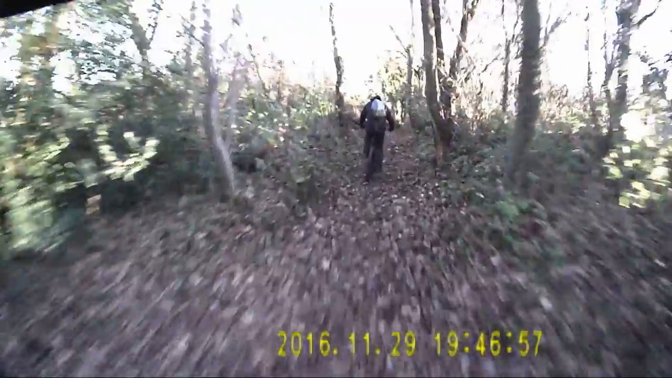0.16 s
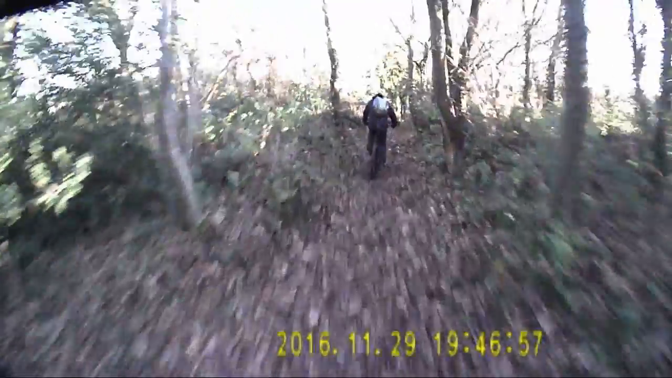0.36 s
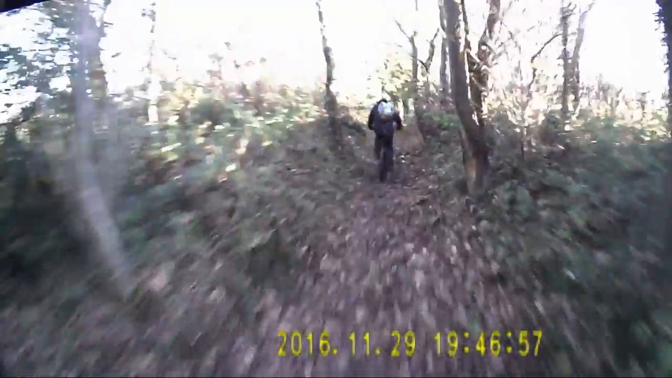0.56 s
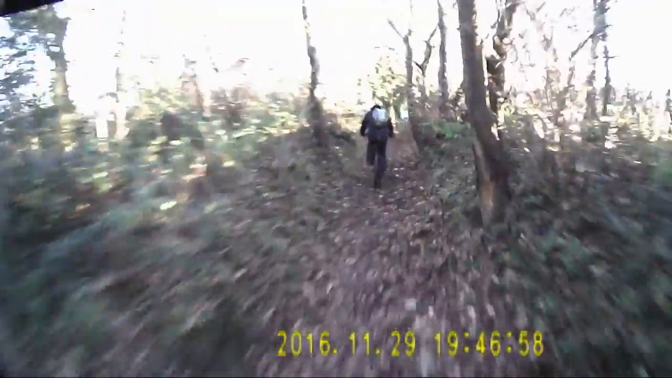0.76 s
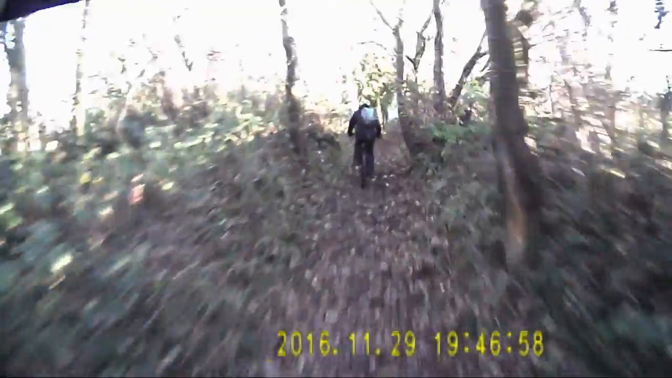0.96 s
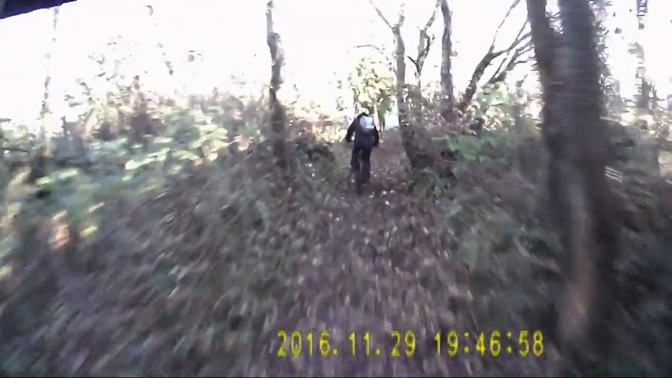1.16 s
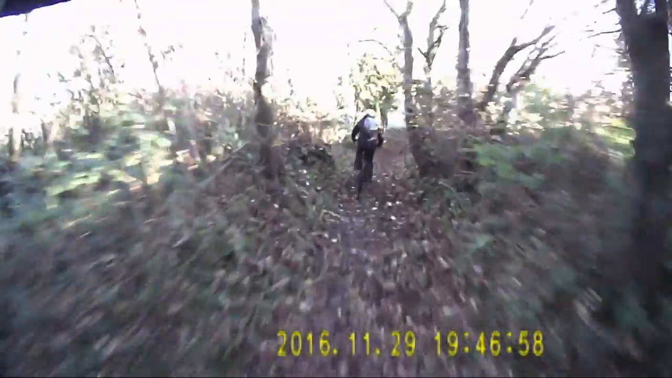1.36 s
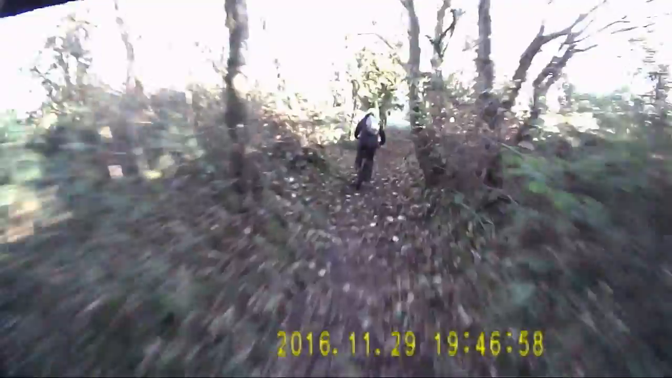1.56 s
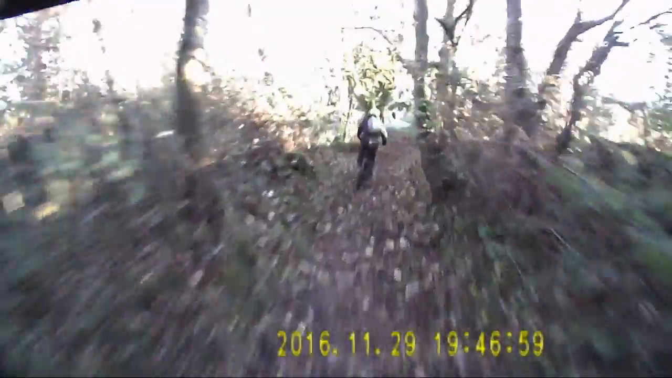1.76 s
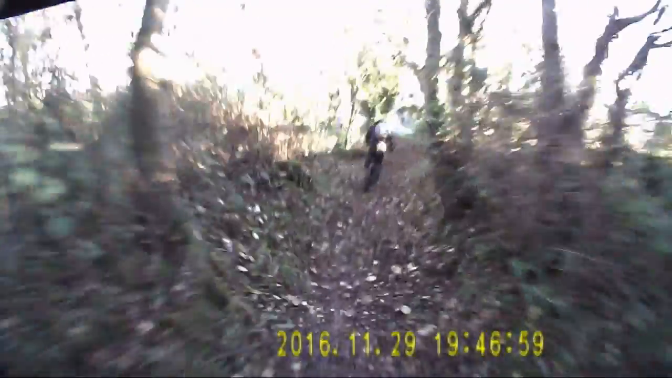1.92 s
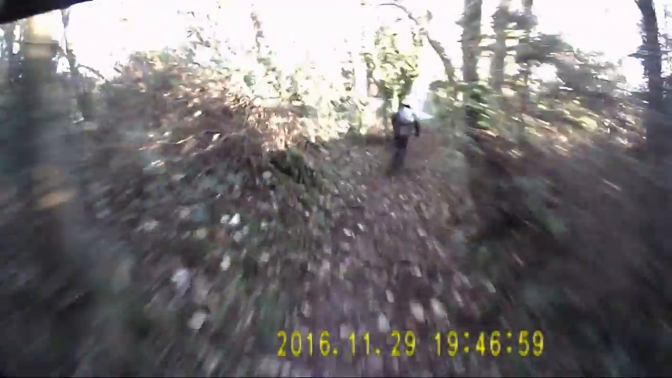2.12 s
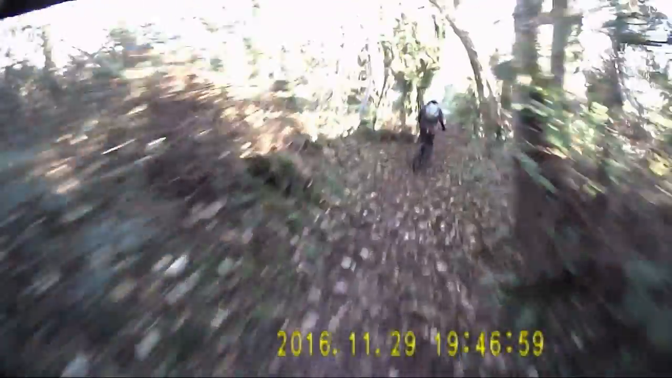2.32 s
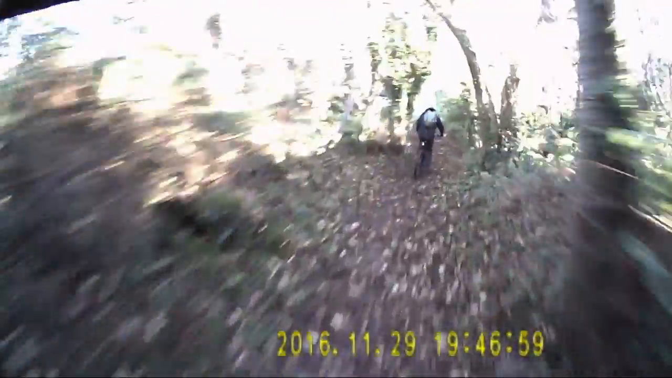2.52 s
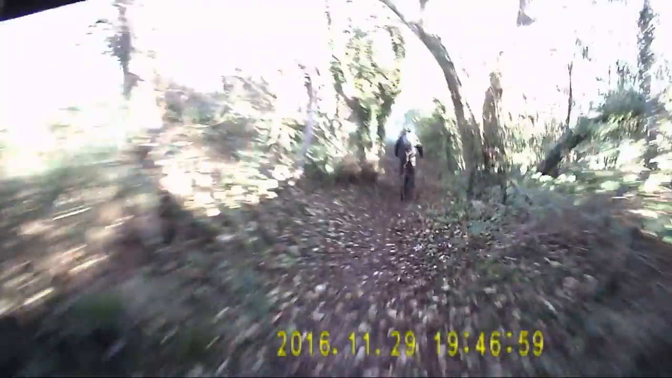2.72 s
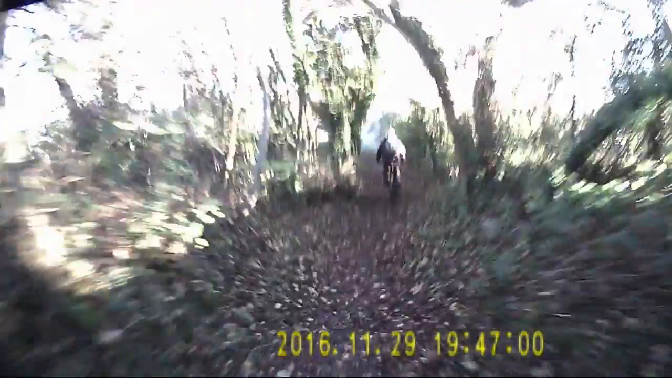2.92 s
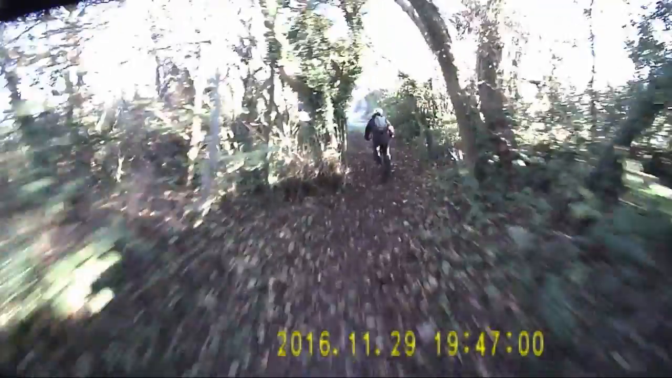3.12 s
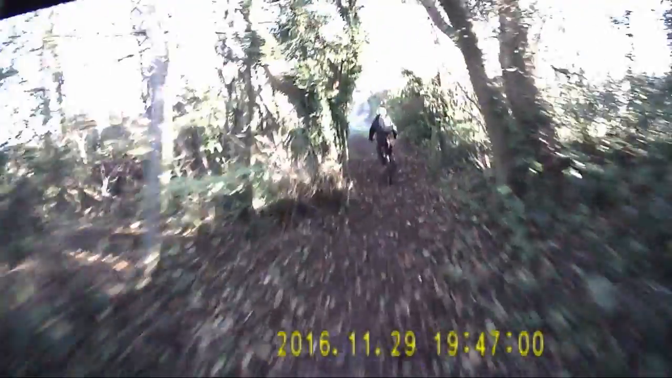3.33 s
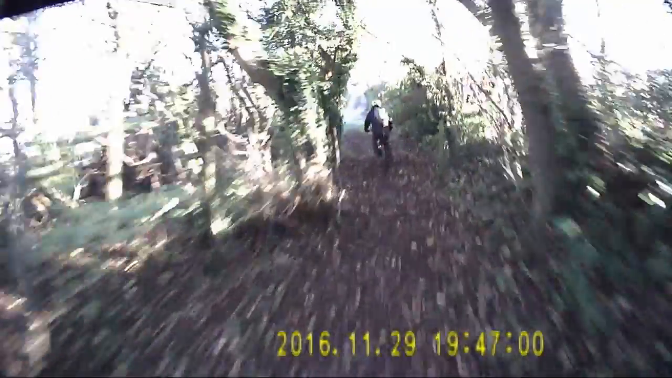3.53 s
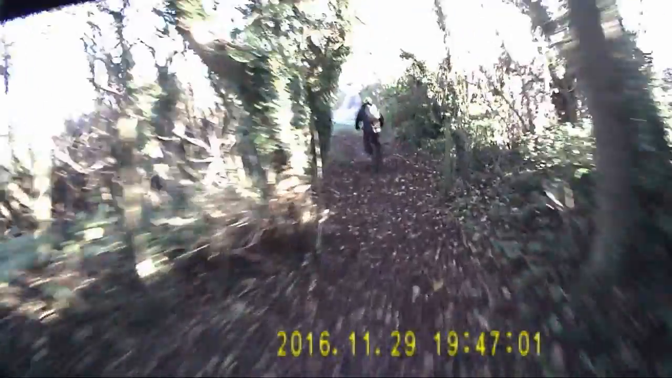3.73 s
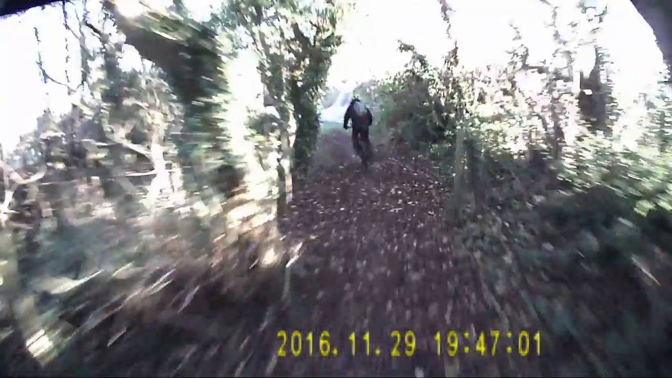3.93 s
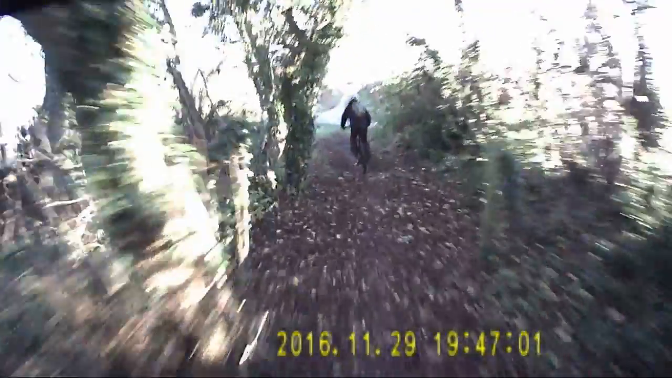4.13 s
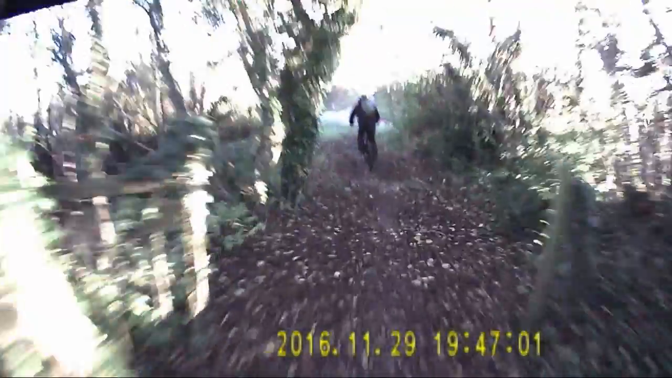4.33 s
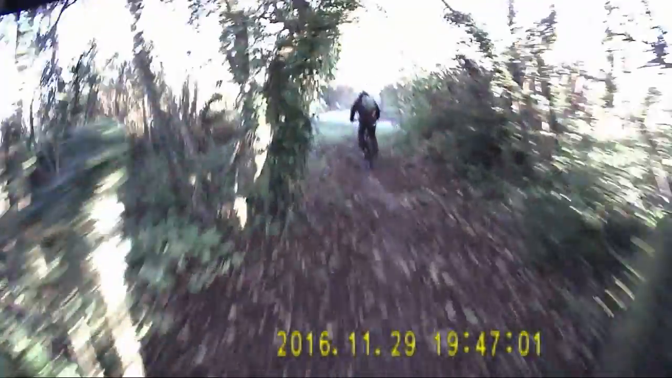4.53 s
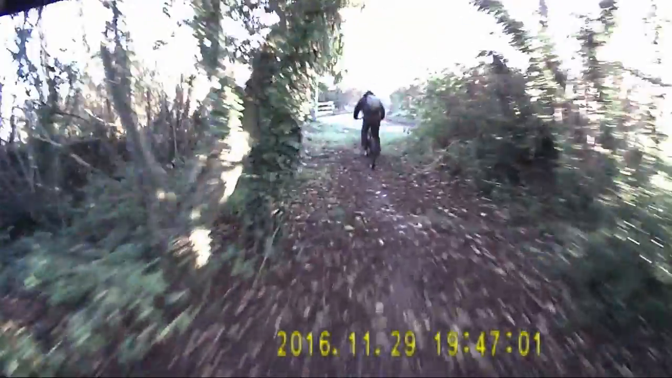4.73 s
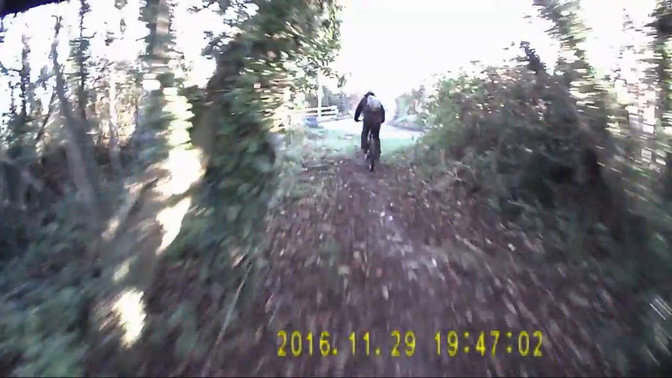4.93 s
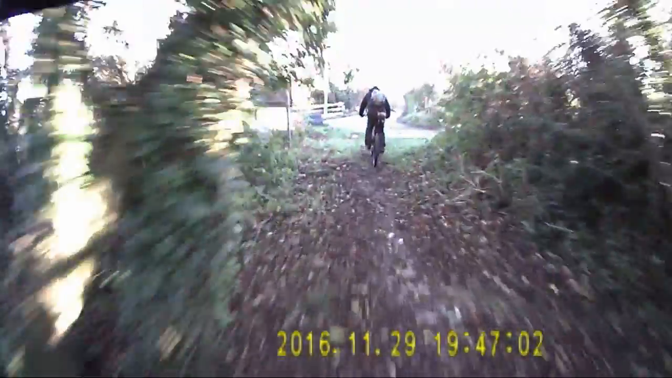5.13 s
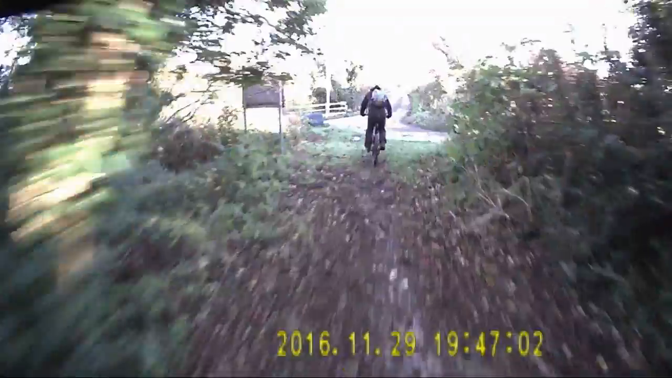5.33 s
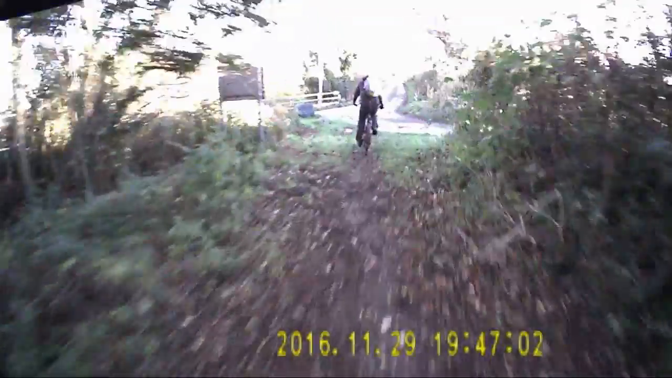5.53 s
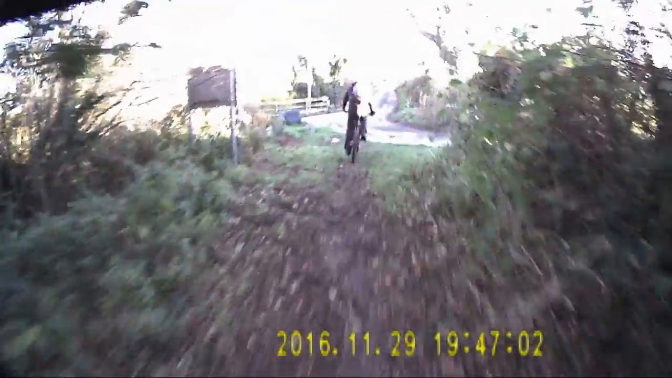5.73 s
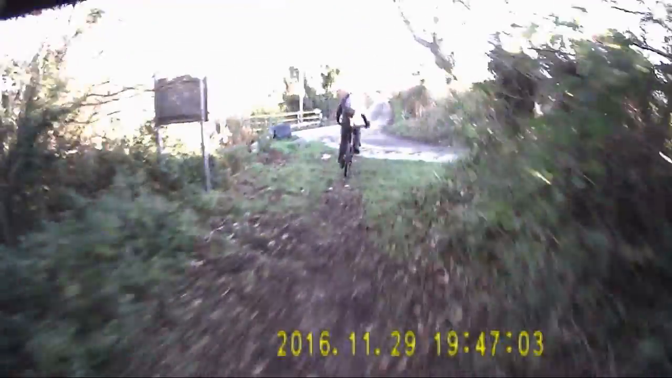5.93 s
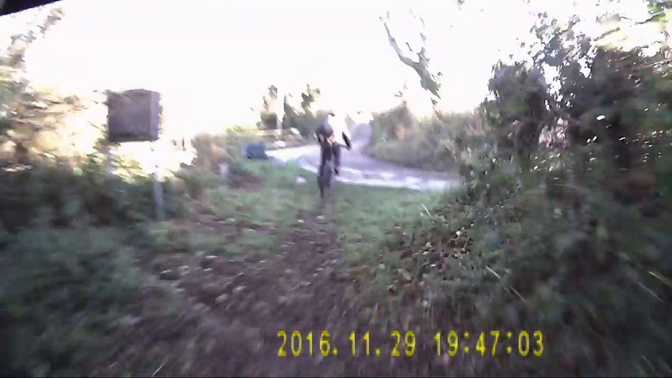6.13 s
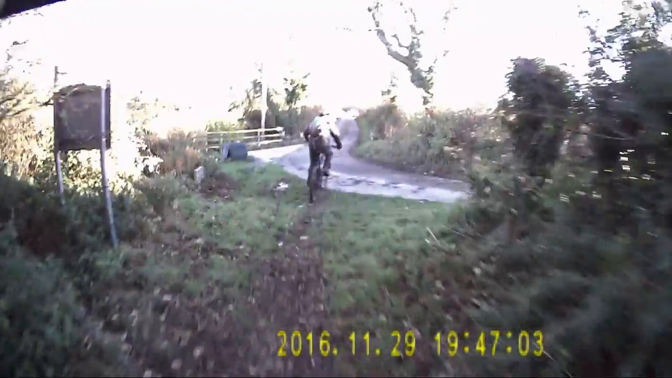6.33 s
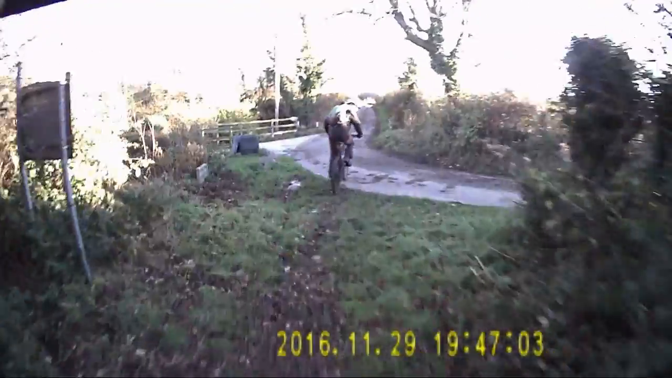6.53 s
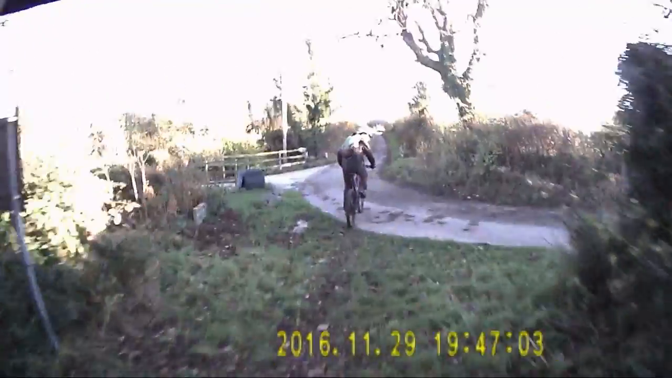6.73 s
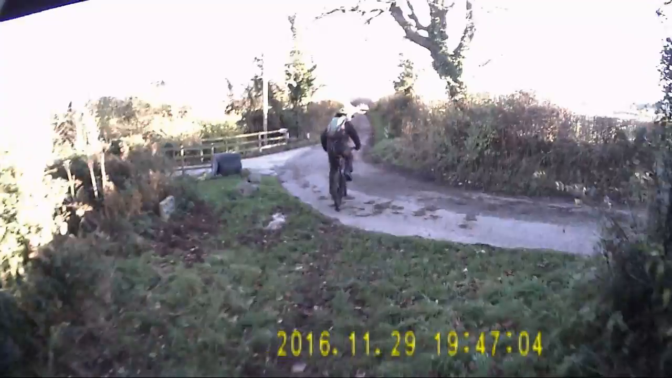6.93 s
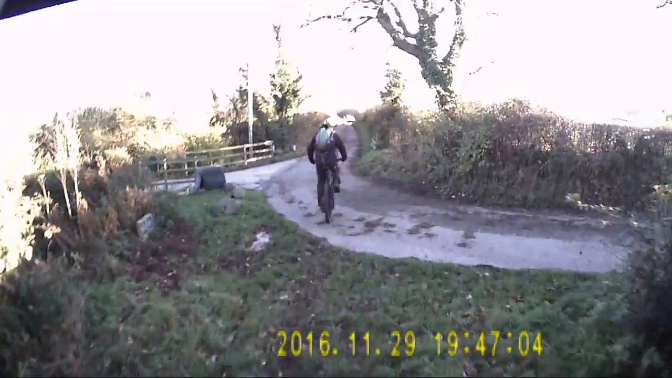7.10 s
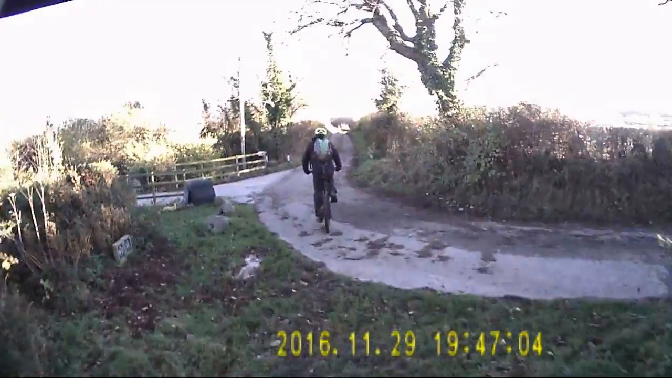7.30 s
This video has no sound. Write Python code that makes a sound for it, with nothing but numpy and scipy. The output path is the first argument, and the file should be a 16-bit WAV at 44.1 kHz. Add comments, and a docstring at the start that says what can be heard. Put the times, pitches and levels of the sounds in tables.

```python
"""Wind roars and buffets at a small helmet camera as a mountain bike runs down a leafy trail and slows onto grass.
Filtered noise makes the wind and a faint hiss; random cracks and ringing stalks make the leaves under the tyres.
Decaying rings make ticks, knocks, snaps and a clack; grains make brushing and dirt; pulsed noise, the chain.
The camera samples slowly and smooths poorly, so the sound is mirrored faintly into the treble."""
import sys
import numpy as np
from scipy import signal
from scipy.fft import rfft, irfft, next_fast_len
from scipy.io import wavfile
from scipy.ndimage import map_coordinates

SR = 44100
rng = np.random.default_rng(int(sys.argv[2]) if len(sys.argv) > 2 else 0)


def generate_wav(signal):
    """Clip the signal to [-1, 1] and save it as 16-bit WAV at the path in sys.argv[1]."""
    frames = np.transpose(np.atleast_2d(signal))
    scaled = np.clip(frames, -1, 1) * 32767
    pcm = np.round(scaled).astype(np.int16)
    wavfile.write(sys.argv[1], SR, pcm)


N = 328986
TIME_S = np.arange(N) / SR
CAMERA_HZ = 8000  # sampling rate of the camera


def amp(db):
    """Decibels to gain."""
    return 10 ** (np.asarray(db) / 20)


def unit(x):
    """Scale to rms 1."""
    return x / np.sqrt(np.mean(x ** 2) + 1e-20)


def along(points, hz):
    """Read (hz, value) points on a log frequency axis."""
    point_hz, value = np.transpose(points)
    return np.interp(np.log(hz + 1), np.log(point_hz + 1), value)


def curve(rows):
    """Interpolate (time_s, value) rows to one value per sample."""
    time_s, value = np.transpose(rows)
    return np.interp(TIME_S, time_s, value)


def bump(middle_s, sigma_s):
    """Gaussian rise and fall, peak 1."""
    return np.exp(-.5 * ((TIME_S - middle_s) / sigma_s) ** 2)


def wobble(knots_per_s):
    """Smooth random curve through normally distributed knots."""
    knots = rng.standard_normal(4096)
    return map_coordinates(knots, [np.arange(N) * knots_per_s / SR], mode="wrap")


def coloured(x, spectrum):
    """Minimum-phase filter of x, cut off at half the camera rate, at rms 1."""
    size = 2 * next_fast_len(N // 2 + 8192)
    hz = np.fft.rfftfreq(size, 1 / SR)
    # folding the cepstrum onto positive time makes the filter causal
    cepstrum = irfft(np.log(amp(along(spectrum, hz))))
    cepstrum[1:size // 2] *= 2
    cepstrum[size // 2 + 1:] = 0
    response = np.exp(rfft(cepstrum)) * (hz < CAMERA_HZ / 2)
    return unit(irfft(rfft(x, size) * response)[:N])


def noise(spectrum):
    """Coloured noise of rms 1."""
    return coloured(rng.standard_normal(N), spectrum)


def grains(rate_per_s, scatter_db):
    """Tiny fractures at random moments, of random sign and scattered size, at rms 1."""
    struck = rng.random(N) < rate_per_s / SR
    size = amp(scatter_db * np.clip(rng.standard_normal(N), -2, 2))
    return unit(struck * size * rng.choice([-1, 1], N))


def blows(table, swell_s, chatter_db, chatter_t60_s, chatter_per_s):
    """Each blow swells and rings briefly; small decaying rebounds ring the same part again."""
    t = np.arange(SR // 12) / SR
    shape = (t / swell_s * np.exp(1 - t / swell_s)) ** 2  # peaks at swell_s
    out = np.zeros(N + SR)
    for start_s, level_db, ring_hz in table:
        rebounds = (rng.random(len(t)) < chatter_per_s / SR) * rng.standard_normal(len(t))
        contacts = signal.unit_impulse(len(t)) + rebounds * amp(chatter_db - 60 * t / chatter_t60_s)
        ring = signal.fftconvolve(contacts, shape * np.sin(2 * np.pi * ring_hz * t))
        out[round(start_s * SR):][:len(ring)] += amp(level_db) * ring
    return out[:N]


def click(start_s, peak_db, spectrum):
    """One clean impulse through a body of this spectrum, scaled to peak_db."""
    ring = coloured(signal.unit_impulse(N, round(start_s * SR)), spectrum)
    return amp(peak_db) * ring / np.abs(ring).max()


# roar level following air speed, before gusts: time_s, level_db
ROAR_LEVEL = [(0, -37.5), (0.8, -35), (1.27, -42), (1.52, -34.5), (1.78, -37), (2.1, -34.5), (2.4, -37.5),
              (2.65, -32), (3.3, -31.5), (4.1, -32), (5.05, -35), (5.28, -38.5), (6.35, -41), (6.52, -44.5),
              (6.8, -43), (7.1, -52), (7.46, -51)]
# brief gusts on top: middle_s, rise_db
GUSTS = [(1.93, 3.5), (2.12, 1.5), (3.49, 5)]
# slow buffeting on the microphone port: time_s, level_db
BUFFET_LEVEL = [(0, -32), (0.35, -33.5), (0.95, -34), (1.7, -36.5), (1.95, -33.5), (3.1, -33.5),
                (3.75, -30), (4.8, -34), (5.6, -33.5), (6.4, -36), (7.46, -42)]
# spectra of buffeting, roar and small eddies: hz, relative_db
BUFFET_SPECTRUM = [(12, -5.5), (25, -1.5), (45, -2.5), (75, 0.5), (110, -2), (160, -8.5), (300, -39),
                   (800, -81.5)]
ROAR_SPECTRUM = [(40, -17), (95, -11.5), (145, -0.5), (200, -3.5), (300, -9), (450, -17), (700, -25),
                 (1200, -37), (3000, -62.5)]
EDDY_SPECTRUM = [(120, -32), (280, -1), (450, 0.5), (700, -4.5), (1100, -9), (1700, -16.5), (3500, -43)]
GUST_SIGMA_S = 0.043
CRUISE_DB = -32  # roar at full pace
EDDY_AT_CRUISE_DB, EDDY_DB_PER_ROAR_DB = -46.5, 1.45


def wind():
    """Slow buffeting under a roar; faster air sheds small eddies that grow quicker than the roar."""
    roar_db = curve(ROAR_LEVEL)
    for middle_s, rise_db in GUSTS:
        roar_db = roar_db + rise_db * bump(middle_s, GUST_SIGMA_S)
    eddy_db = EDDY_AT_CRUISE_DB + EDDY_DB_PER_ROAR_DB * (roar_db - CRUISE_DB)
    buffet = amp(curve(BUFFET_LEVEL)) * unit(noise(BUFFET_SPECTRUM) * amp(1.33 * wobble(9)))
    roar = amp(roar_db) * unit(noise(ROAR_SPECTRUM) * amp(1.17 * wobble(18)))
    eddies = amp(eddy_db) * unit(noise(EDDY_SPECTRUM) * amp(4.0 * wobble(70)))
    return buffet + roar + eddies


def stalk_pops(count):
    """Dry stalks snap at random: rows of start_s, relative_db, ring_hz."""
    when, size, pitch = rng.random((count, 3)).T
    return np.column_stack([when * N / SR, -10 * size, 1300 + 900 * np.sqrt(pitch)])


# crunch following leaf depth, thinning onto grass, before patches and mix: time_s, level_db
CRUNCH_LEVEL = [(0, -45), (0.15, -55.5), (0.3, -51), (0.95, -49.5), (1.3, -51.5), (2.5, -51), (3.0, -50),
                (4.3, -49), (4.95, -50.5), (5.35, -46.5), (5.62, -53), (6.12, -50.5), (6.35, -55),
                (7.0, -58.5), (7.46, -62.5)]
# spectrum of crushed leaves: hz, relative_db
LEAF_SPECTRUM = [(150, -19), (500, -8.5), (950, -7), (1250, -1), (1420, -2), (1700, 1), (2000, -1),
                 (2250, -5), (2600, -11), (3250, -15.5), (3700, -18), (4000, -35.5)]
PATCH_DB, PATCHES_PER_S = 1.02, 8.4  # uneven litter


def tyres():
    """Knobs crush leaves in clumps of tiny cracks, over a softer rustle; dry stalks pop at their own pitches."""
    crunch_db = curve(CRUNCH_LEVEL) + PATCH_DB * wobble(PATCHES_PER_S)
    clumps = amp(2.1 * wobble(45) + 2.9 * wobble(220))
    cracks = unit(grains(rate_per_s=1800, scatter_db=0.5) * clumps)
    rustle = amp(-4.5) * rng.standard_normal(N)
    leaves = coloured(cracks + rustle, LEAF_SPECTRUM)
    stalks = unit(blows(stalk_pops(count=260), swell_s=0.0011, chatter_db=-5.5,
                        chatter_t60_s=0.065, chatter_per_s=400))
    return amp(crunch_db) * (amp(-2.0) * leaves + amp(-9.0) * stalks)


# spectrum of the rolling hiss: hz, relative_db
HISS_SPECTRUM = [(100, -6), (450, -9), (850, -1), (1300, 1.5), (2100, 4), (2700, -10.5), (3300, -5),
                 (3750, -14.5), (4000, -17.5)]


def hiss():
    """Faint, fluttering noise of the rolling bike that remains on the grass."""
    return amp(-58.5) * unit(noise(HISS_SPECTRUM) * amp(2.7 * wobble(60)))


# loudest ticks of chain and twigs: start_s, level_db, ring_hz
TICKS = [(0.2185, -33, 2070), (0.2975, -34, 1810), (0.3903, -29.5, 1770), (0.7367, -34, 2040),
         (1.2672, -40, 2200), (1.5235, -34.5, 1543), (1.5711, -35.5, 1580), (1.6397, -31, 1900),
         (2.174, -38, 1840), (2.2655, -28, 1720), (2.3822, -34.5, 1800), (2.4093, -35, 1870),
         (2.6718, -28, 1880), (2.892, -33.5, 1750), (2.9866, -34.5, 1740), (3.0615, -34, 1860),
         (3.0984, -35, 2100), (4.4626, -32, 1710), (4.87, -33.5, 1790), (5.5692, -31.5, 1810),
         (5.608, -35.5, 1760), (5.722, -30.5, 1750), (5.9613, -29, 1640), (5.9868, -35, 1560),
         (6.2073, -32, 2010), (6.5703, -40, 1740), (7.2529, -41, 1840)]
# duller knocks of the frame over roots: start_s, level_db, ring_hz
KNOCKS = [(1.193, -35, 730), (2.841, -31, 1210), (3.179, -35, 1070), (3.776, -24, 1090), (3.842, -28, 600),
          (5.698, -30, 950), (5.826, -39, 1010), (6.617, -43, 789)]
# bright snaps close by: start_s, peak_db
SNAPS = [(1.1735, -28.5), (1.9993, -31.5), (5.6983, -33.5), (6.5695, -31.5)]
# one hard clack: start_s, peak_db
CLACK = (5.3639, -13)
# hollow plastic body of the clack: hz, relative_db
HOLLOW_SPECTRUM = [(200, -28), (700, -21), (1000, -14.5), (1300, -10), (1600, -5), (1930, -0.5),
                   (2200, -11.5), (2480, -21), (2700, -35), (3100, -29), (4000, -45)]


def rattles():
    """Ticks and knocks ring with rebounds; snaps and one hard clack are single impulses through a body."""
    ticks = blows(TICKS, swell_s=0.00062, chatter_db=-10.0, chatter_t60_s=0.13, chatter_per_s=980)
    knocks = blows(KNOCKS, swell_s=0.00085, chatter_db=-8.5, chatter_t60_s=0.042, chatter_per_s=510)
    snaps = sum(click(start_s, peak_db, BRUSH_SPECTRUM) for start_s, peak_db in SNAPS)
    clack = click(*CLACK, HOLLOW_SPECTRUM)
    return ticks + knocks + snaps + clack


# brushing close to the microphone: full_contact_s, level_db, hold_s, release_db_per_s
STROKES = [(0.409, -35.5, 0.0064, 700), (0.454, -37.5, 0.019, 131), (0.794, -35, 0.069, 297),
           (5.218, -49.5, 0.01, 300)]
# spectrum of brushing, also of the snaps: hz, relative_db
BRUSH_SPECTRUM = [(120, -17.5), (300, 11), (600, 1), (850, -8.5), (1200, 2.5), (1450, -2), (1900, 2),
                  (2450, -4.5), (2700, -3), (3300, -6.5), (3750, -13.5), (4000, -18)]
ATTACK_DB_PER_S = 246


def brushing():
    """Scratchy swishes of dense grains by the microphone: each swells, holds and dies away."""
    level = np.zeros(N)
    for contact_s, level_db, hold_s, release_db_per_s in STROKES:
        attack_db = ATTACK_DB_PER_S * np.maximum(contact_s - TIME_S, 0)
        release_db = release_db_per_s * np.maximum(TIME_S - contact_s - hold_s, 0)
        level += amp(level_db - attack_db - release_db)
    scratches = grains(rate_per_s=5500, scatter_db=0.5) * amp(0.93 * wobble(157.3))
    return level * coloured(scratches, BRUSH_SPECTRUM)


# tyre ploughing through loose dirt: middle_s, level_db, sigma_s
SCUFFS = [(2.674, -40, 0.015), (3.514, -51.5, 0.014), (5.621, -47.5, 0.017), (5.729, -44.5, 0.024),
          (5.988, -43.5, 0.0061), (6.226, -51.5, 0.011), (6.632, -54.5, 0.012)]
# spectrum of loose dirt: hz, relative_db
DIRT_SPECTRUM = [(100, -13), (280, 3), (500, -0.5), (900, -2), (1500, -4.5), (2000, -4), (2600, -13),
                 (4000, -30)]


def scuffs():
    """Short swells of gritty grains, fuller than the leaves."""
    level = sum(amp(level_db) * bump(middle_s, sigma_s) for middle_s, level_db, sigma_s in SCUFFS)
    return level * coloured(grains(rate_per_s=1500, scatter_db=4.0), DIRT_SPECTRUM)


# chain rasp at pulse crests: time_s, level_db
CHAIN_LEVEL = [(6.3, -68), (6.55, -59), (6.9, -69), (7.16, -55.5), (7.46, -61)]


def chain(pulse_hz=12.5, crest_s=7.16, sharpness=3):
    """Thin noise rasps in short regular pulses with the turning drivetrain."""
    turn_rad = 2 * np.pi * pulse_hz * (TIME_S - crest_s)
    pulses = np.exp(sharpness * (np.cos(turn_rad) - 1))
    rasp = noise([(800, -29.5), (2000, 1.5), (3150, 1.5), (4000, -19.0)])  # hz, relative_db
    return amp(curve(CHAIN_LEVEL)) * pulses * rasp


def scene():
    """Everything meets at the one microphone."""
    return (wind() + tyres() + hiss() + rattles() + brushing() + scuffs() + chain())[None]


# smoothing gain over the mirrored sound: hz, gain_db
MIRROR_GAIN = [(4000, 0), (5200, -11), (6100, -20), (7000, -34), (7600, -51), (8000, -75), (8500, -49),
               (9400, -33), (10600, -25), (12000, -20), (13000, -25), (14200, -36), (15400, -52)]
TOP_HZ = 15720


def record(dry):
    """Slow sampling repeats the spectrum around each multiple of its rate; smoothing weakens the copies."""
    seconds = N // SR + 1
    soft_ends = signal.windows.tukey(N, .001)
    band = rfft(dry[0] * soft_ends, seconds * SR)[:seconds * CAMERA_HZ // 2 + 1]
    hz = np.fft.rfftfreq(seconds * SR, 1 / SR)
    one_period = np.concatenate([band, band[-2:0:-1].conj()])
    mirrored = np.resize(one_period, len(hz))
    smoothing = amp(along(MIRROR_GAIN, hz)) * (hz < TOP_HZ)
    return irfft(mirrored * smoothing)[None, :N]


dry = scene()
out = record(dry)
generate_wav(out)
```